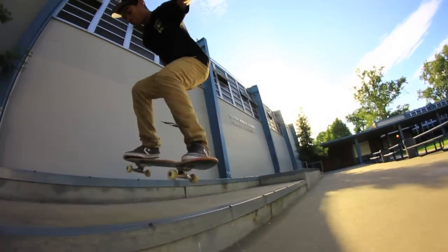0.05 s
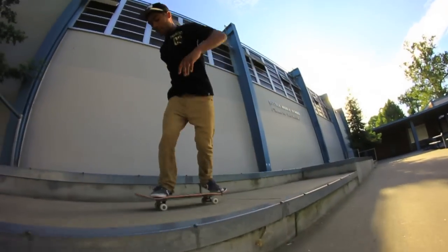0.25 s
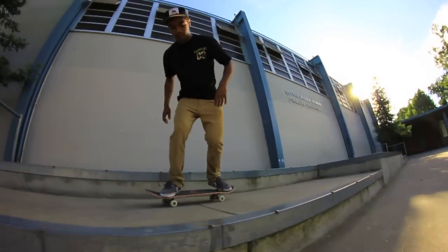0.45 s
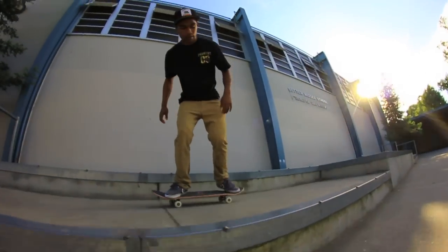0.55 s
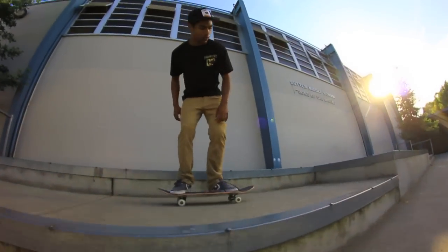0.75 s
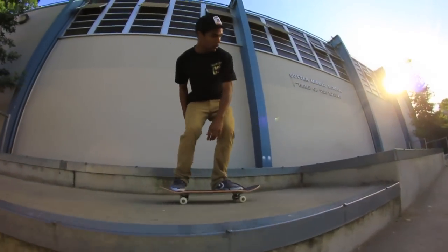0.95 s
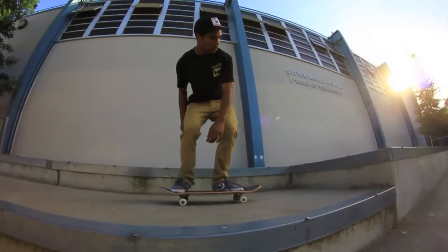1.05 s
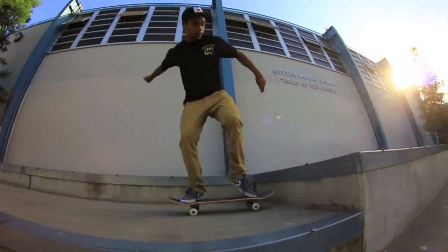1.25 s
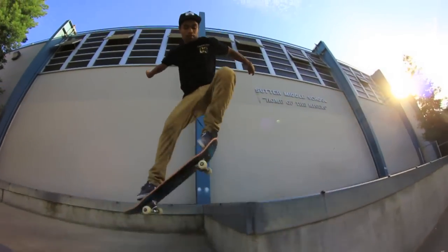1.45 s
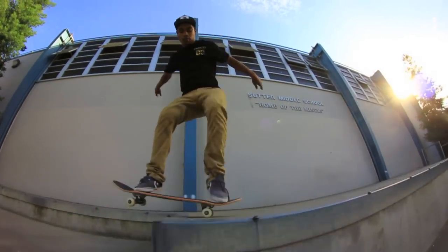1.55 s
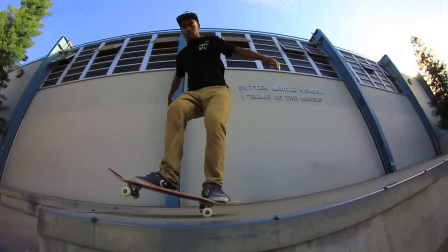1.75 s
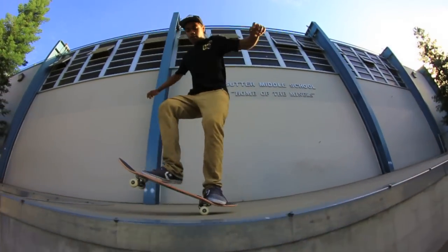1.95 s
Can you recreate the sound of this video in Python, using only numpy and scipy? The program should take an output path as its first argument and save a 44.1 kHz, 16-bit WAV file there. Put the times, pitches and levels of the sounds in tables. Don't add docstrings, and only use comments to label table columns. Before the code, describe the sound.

Skateboard landing hard outdoors: sharp wooden clack, short wheel squeal, rough rolling, tail snap and drop

```python
import sys
import numpy as np
from scipy import signal
from scipy.io import wavfile

SR = 44100
rng = np.random.default_rng(int(sys.argv[2]) if len(sys.argv) > 2 else 0)


def amplitude_ratio(level_db):
    exponent = np.asarray(level_db, float) / 20
    return 10 ** exponent


def put_to_file(sound):
    columns = np.atleast_2d(sound).T
    safe = np.clip(columns, -1, 1)
    whole_steps = np.round(safe * 32767)
    wavfile.write(sys.argv[1], SR, whole_steps.astype(np.int16))


N = 88200


def rms_one(x):
    return x / np.sqrt(np.mean(x ** 2) + 1e-20)


def in_time(rows):
    s, *columns = np.transpose(rows)
    return [np.interp(np.arange(N) / SR, s, c) for c in columns]


def drift(rate):
    r = np.exp(-2 * np.pi * rate / SR)
    course = signal.lfilter([1], [1, -2 * r, r * r], rng.standard_normal(N + SR))
    return rms_one(course[SR:])


def soften(x, hz):
    r = np.exp(-2 * np.pi * hz / SR)
    return signal.lfilter([1 - r], [1, -r], x)


def high_pass(x, hz):
    return signal.sosfilt(signal.butter(2, hz, "high", fs=SR, output="sos"), x)


def dying(x, t60):
    return signal.lfilter([1], [1, -amplitude_ratio(-60 / (t60 * SR))], x + 1e-18)


def ring(x, modes):
    out = 0
    for hz, db, t60 in modes:
        r = amplitude_ratio(-60 / (t60 * SR))
        w = 2 * np.pi * hz / SR
        out = out + amplitude_ratio(db) * signal.lfilter([0, np.sin(w)], [1, -2 * r * np.cos(w), r * r], x + 1e-18)
    return out


def resonate(x, peaks):
    out = 0
    for k, (hz, width, db) in enumerate(peaks):
        r = np.exp(-np.pi * width / SR)
        poles = [1, -2 * r * np.cos(2 * np.pi * hz / SR), r * r]
        out = out + (-1) ** k * amplitude_ratio(db) * signal.lfilter([1 - r, 0, r - 1], poles, x + 1e-18)
    return out


def grains(per_s, spread):
    sizes = amplitude_ratio(spread * np.minimum(rng.exponential(1, N), 4)) * rng.choice([-1, 1], N)
    return rms_one(sizes * (rng.random(N) < per_s / SR))


def banded_noise(spectrum, patchy_db, rate):
    hz, db = np.transpose(spectrum)
    edges = np.minimum(hz[0] * 2 ** (np.arange(40) / 3), 19000)
    together = drift(rate / 3)
    white = rng.standard_normal((2, N + 4000))
    out = 0
    for k, (low, high) in enumerate(zip(edges, edges[1:])):
        if low < min(hz[-1], high):
            sos = signal.butter(2, [low, high], "band", fs=SR, output="sos")
            band = signal.sosfilt(sos, white[k % 2])[4000:]
            band_db = np.interp(np.log(low * high) / 2, np.log(hz), db)
            out = out + band * amplitude_ratio(band_db + patchy_db * (0.49 * together + drift(rate)))
    return rms_one(out)


def blows():
    # time in seconds, then deck flex, truck knock, rattle and crack levels in dB.
    hits = [(.0002, -14.5, -13.5, -27.5, -61), (0.0731, -39, -59, -30.5, -44), (.2024, -35, -1, -7.5, -23),
            (.2062, -26, -5.5, -12, -14.5), (0.2203, -17.5, -25, -6, -7.5), (.2250, -40, -25, -12.5, -13),
            (0.229, -40, -30, -21, -18), (0.232, -7, -12, -16, -32), (.2456, -9, -7, -4, -16),
            (0.413, -17.5, -19, -19.5, -24), (0.417, -12.5, -39, -21.5, -30),
            (0.5513, -18.5, -35, -20.5, -24), (0.5612, -20, -41, -24, -29), (0.7594, -37, -46, -35.5, -33),
            (1.361, -40, -36, -28, -44), (1.371, -38, -47, -31.5, -47), (1.5833, -51, -37, -45, -17),
            (1.585, -40, -40, -13, -27), (1.5944, -42, -11, -14, -12), (1.7266, -51.5, -7.5, -33, -65),
            (1.7297, -29, -6, -34, -42), (1.739, -9.5, -35, -27, -52), (1.7408, -40, -7.5, -28.5, -55)]
    # frequency in Hz, level in dB, t60 in seconds.
    flex_modes = [(101, -12, 0.25), (252, -14.5, 0.061), (334, -3.5, 0.033), (560, -3, 0.019)]
    knock_modes = [(540, 0, 0.007), (638, 2.5, 0.017), (750, -20.5, 0.029)]
    # frequency in Hz, width in Hz, level in dB.
    press_flex = [(410, 275, 1.66)]
    press_knock = [(653, 178, 5.67)]
    # frequency in Hz, width in Hz, level in dB.
    rattle_peaks = [(526, 224, 9.5), (760, 250, 12), (1070, 364, 12), (1474, 504, 10.5), (1626, 130, 2.5),
                    (2050, 270, 0), (2540, 1050, 2.5), (3610, 870, 0.5), (4300, 320, -33)]

    s, *levels = np.transpose(hits)
    flex, knock, rattle, crack = np.zeros((4, N))
    for train, db in zip((flex, knock, rattle, crack), levels):
        train[(s * SR).astype(int)] = amplitude_ratio(db)
    deck = ring(resonate(flex, press_flex), flex_modes)
    trucks = ring(resonate(knock, press_knock), knock_modes)
    shake = dying(rattle, t60=0.045) * (grains(per_s=3500, spread=2.0) + .5 * rng.standard_normal(N))
    dull = soften(soften(rng.standard_normal(N), hz=5950), hz=11000)
    bright = high_pass(amplitude_ratio(2.5) * dull, hz=4800)
    crack_swell = dying(crack, t60=0.035) + amplitude_ratio(2) * dying(crack, t60=0.0018)
    return deck + trucks + amplitude_ratio(6.0) * resonate(shake, rattle_peaks) + amplitude_ratio(-1.5) * crack_swell * bright


def pop():
    # time in seconds, ply level in dB, snap level in dB.
    slaps = [
        (1.5819, -20, -7.5),
        (1.5848, 3, -16),
        (1.587, -51, -9),
        (1.5923, -23, -17),
        (1.5973, -6, -17),
    ]
    # frequency in Hz, level in dB, t60 in seconds.
    tail_modes = [(107.6, -11.5, 0.4), (267.5, -39, 0.023), (530, -19, 0.049)]
    # frequency in Hz, width in Hz, level in dB.
    press_tail = [(306, 96, 10.5), (545, 310, 8.5)]
    # frequency in Hz, width in Hz, level in dB.
    snap_peaks = [(1120, 233, 3.5), (1400, 330, 1.5), (1690, 240, 2), (2210, 420, -0.5), (2830, 480, -2),
                  (3600, 1060, -4), (5100, 3550, -13)]

    ply, snap = np.zeros((2, N))
    for s, ply_db, snap_db in slaps:
        i = int(s * SR)
        ply[i], snap[i] = amplitude_ratio(ply_db), amplitude_ratio(snap_db)
    shake = dying(snap, t60=0.02) * (grains(per_s=3300, spread=3.4) + 1.12 * rng.standard_normal(N))
    return ring(resonate(ply, press_tail), tail_modes) + amplitude_ratio(9.0) * resonate(shake, snap_peaks)


def taps():
    # time in seconds, frequency in Hz, peak level in dB, swell in milliseconds.
    contacts = [(.2030, 344, -8, 2.9), (.2062, 3240, -9, 1.1), (.2108, 3380, -10, 1.1),
                (.2208, 3580, -22, 1.1), (0.2473, 3300, -4, 1.7), (.2240, 1400, -2, 1.7),
                (1.7390, 306, -14, 4.2), (.2250, 63.4, -29, 7.6), (.2335, 800, -7.5, 2.3),
                (.2330, 346, -15.5, 3.6), (.4122, 4440, -20, 0.47), (.4126, 2260, -16, 0.74),
                (.4128, 3230, -20.5, .9), (.4126, 402, -15.5, 1.5), (.4155, 1170, -20, 1),
                (.4162, 571, -9.5, 1.77), (.4205, 1710, -19, 1.1), (.4218, 690, -29, 0.78),
                (.4255, 1100, -19, 0.99), (.5513, 620, -10, 2.2), (.5515, 1850, -18.5, 1.5),
                (.5546, 2980, -22, 0.97), (.5565, 570, -9, 0.91), (.5588, 1620, -19.5, 1.2),
                (.5616, 790, -12, 2), (.5622, 558, -11.5, 1.6), (.5705, 510, -16, 1.8),
                (.5752, 1210, -15, 1), (.5530, 215, -21, 6.7), (.7595, 1480, -22, 1.5),
                (.7600, 422, -24, 3.1), (.7635, 1150, -24, 1.5), (.7662, 540, -22.5, 1.7),
                (1.362, 3730, -27, 1.2), (1.3626, 1740, -23, 3), (1.3652, 1514, -24, 1.7),
                (1.3688, 1400, -27, 1.2), (1.3712, 3270, -25, 1), (1.3700, 301, -26, 2.9),
                (1.3752, 1100, -26, 1.4), (1.5820, 3600, -7, 0.51), (1.5842, 299, -3.5, 4.5),
                (1.5850, 530, -4, 2.9), (1.5862, 3620, -8, 1.2), (1.5872, 1700, -10, 0.74),
                (1.5885, 2680, -10, 1), (1.5935, 3600, -15, 0.53), (1.5975, 2820, -35, 0.78),
                (1.5985, 315, -6.5, 2.2), (1.6010, 1140, -11, 1.5)]

    out, t = np.zeros(N), np.arange(SR // 8) / SR
    for s, hz, db, swell_ms in contacts:
        u = t * 1000 / swell_ms
        i = int(s * SR)
        out[i:i + len(t)] += amplitude_ratio(db) * u * np.exp(1 - u) * np.sin(2 * np.pi * hz * t)
    return out


def whip():
    start_s, level_db, t60_s = .2208, -2, 0.087
    from_hz, to_hz, fall_s = 5000, 764.4, .0022
    t = np.maximum(np.arange(N) / SR - start_s, 0)
    hz = to_hz + (from_hz - to_hz) * np.exp(-t / fall_s)
    return (t > 0) * amplitude_ratio(level_db - 60 * t / t60_s) * np.sin(2 * np.pi * np.cumsum(hz) / SR)


def squeal():
    # time in seconds, slip rate in Hz, level in dB, roughness from 0 to 1.
    slips = [
        (.2435, 606.3, -19, .5),
        (.2465, 620, 1, 0.39),
        (.2565, 682.7, -6.5, 0.04),
        (.2605, 591.7, -5.5, 0.09),
        (.293, 565, -8, 0.15),
        (.301, 565.3, -11.5, 0.38),
        (.330, 545, -15, 0.52),
        (.3355, 540, -43, 0.2),
        (.35, 540, -62, .3),
    ]
    # frequency in Hz, level in dB.
    body = [(500, -10.5), (700, -4), (1200, 1), (1950, 3.5), (2350, -2), (2850, -20), (3420, -5.5),
            (4700, -23)]
    # frequency in Hz, density in dB per Hz.
    skid_colour = [(240, -56), (400, -21), (1140, -5.5), (1580, -2), (2670, -5.5), (3310, -14),
                   (9500, -26.5), (16000, -35)]

    hz, db, rough = in_time(slips)
    rough = np.clip(rough, 0, .95)
    phase = 2 * np.pi * np.cumsum(hz * (1 + 0.011 * drift(106))) / SR
    stack = 0
    for k in range(1, 9):
        partial_db = np.interp(k * hz, *np.transpose(body)) + 1.8 * drift(60)
        stack = stack + amplitude_ratio(partial_db) * np.sin(k * phase + rng.uniform(0, 4.26))
    skid = banded_noise(skid_colour, patchy_db=0.2, rate=120) * (1 + 0.67 * np.cos(phase))
    hiss = rms_one(high_pass(skid, hz=4500))
    sound = np.sqrt(1 - rough) * rms_one(stack) + np.sqrt(rough) * skid + amplitude_ratio(-14.5) * hiss
    n = np.arange(N)
    live = (n > slips[0][0] * SR) & (n < slips[-1][0] * SR)
    return live * amplitude_ratio(db) * sound


def rolling():
    # time in seconds, level in dB.
    ridden_course = [(0, -23), (.06, -43.5), (.33, -37.5), (.4, -34), (.55, -31.5), (.75, -33),
                     (.95, -36.5), (1.08, -34), (1.2, -28), (1.29, -33), (1.32, -42.5), (1.42, -45.5),
                     (1.5, -52), (2, -50)]
    # time in seconds, level in dB.
    follow_course = [(0, -34), (.2, -36), (.9, -37), (1.4, -35), (1.57, -36), (1.66, -33), (1.8, -37.5),
                     (2, -34.5)]
    bearing_course = [(0, -69), (.3, -48), (1.5, -57), (1.64, -43), (2, -43)]
    # frequency in Hz, density in dB per Hz.
    ridden_colour = [(88, -48), (150, -9), (457, -3.5), (578, -5), (1690, -9), (2400, -36), (3160, -49),
                     (9500, -38), (16000, -40.5)]
    follow_colour = [(88, -42), (150, -11), (328, 0.5), (383, -5), (689, 4), (774, 1), (1630, -4.5),
                     (3620, -23.5), (16000, -56)]
    bearing_colour = [(3000, 7), (4500, -4.5), (6500, -9), (9000, -13.5), (12000, -26), (16000, -29)]
    # frequency in Hz, width in Hz, level in dB.
    wheel_peaks = [(645, 110, 6.5), (1910, 340, 5), (3320, 170, 0.5)]

    (ridden_db,), (follow_db,), (bearing_db,) = map(in_time, (ridden_course, follow_course, bearing_course))
    ticks = grains(per_s=1900, spread=1.7) * amplitude_ratio(0.75 * drift(38))
    grit = rms_one(resonate(ticks, wheel_peaks))
    ridden = banded_noise(ridden_colour, patchy_db=-2.0, rate=9.8) + amplitude_ratio(-8) * grit
    hum = rms_one(resonate(rng.standard_normal(N), [(620, 52, 3.5), (3500, 370, -9.5)]))
    follow = banded_noise(follow_colour, patchy_db=1.0, rate=8) + amplitude_ratio(-6.5) * hum
    bearings = banded_noise(bearing_colour, patchy_db=1.0, rate=8)
    return amplitude_ratio(ridden_db) * ridden + amplitude_ratio(follow_db) * follow + amplitude_ratio(bearing_db) * bearings


def scuffing():
    # time in seconds, length in seconds, level in dB.
    rubs = [(0.048, 0.003, -69), (0.714, 0.044, -46), (0.743, 0.0084, -44), (0.799, 0.033, -41.5),
            (0.826, 0.026, -49.5), (0.847, 0.011, -47), (1.145, 0.023, -45.5), (1.267, 0.046, -42),
            (1.283, 0.0053, -57), (1.324, 0.0049, -43), (1.334, 0.009, -37.5), (1.344, 0.004, -48),
            (1.368, 0.009, -38.5), (1.392, 0.06, -45.5), (1.533, 0.019, -46.5)]
    # frequency in Hz, density in dB per Hz.
    rub_colour = [(2350, 1), (4000, -3), (4900, -12), (5540, -6.5), (7500, -13.5), (9800, -11.5),
                  (16000, -34)]

    t = np.arange(N) / SR
    swell = sum(amplitude_ratio(db) * np.exp(-((t - s) / length) ** 2) for s, length, db in rubs)
    return swell * amplitude_ratio(2.7 * drift(328)) * banded_noise(rub_colour, patchy_db=3.5, rate=19)


def traffic():
    # frequency in Hz, density in dB per Hz.
    rumble = [(32, -10), (45, -9), (80, -12.5), (112, -0.5), (150, -8.5), (220, -10)]
    return amplitude_ratio(-45.5) * banded_noise(rumble, patchy_db=1.0, rate=8)


def yard(x):
    # delay in seconds, level in dB.
    echoes = [(0.011, -9.5), (.021, -22), (0.034, -24), (.047, -51)]
    out, dull = x.copy(), soften(x, hz=3600)
    for s, db in echoes:
        lag = int(s * SR)
        out[lag:] += amplitude_ratio(db) * dull[:-lag]
    return out


def scene():
    board = blows() + pop() + taps() + whip() + squeal()
    return (yard(board) + rolling() + scuffing() + traffic())[None]


def band_limit(x):
    return signal.sosfilt(signal.butter(12, 16220, fs=SR, output="sos"), x)


def record(dry):
    overload = 1.02
    flat = dry / (1 + np.abs(dry / overload) ** 8) ** (1 / 8)
    top_cut = signal.cheby2(14, 42, 16450, fs=SR, output="sos")
    return band_limit(signal.sosfilt(top_cut, flat))


dry = scene()
out = record(dry)
put_to_file(out)
```